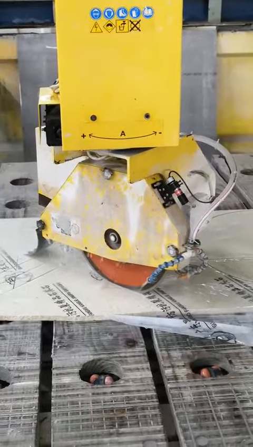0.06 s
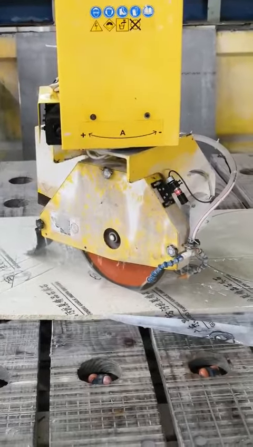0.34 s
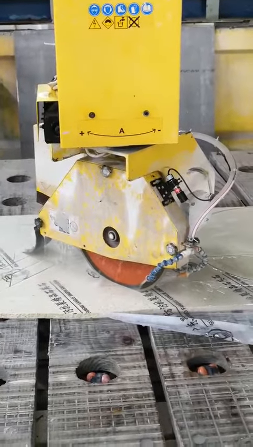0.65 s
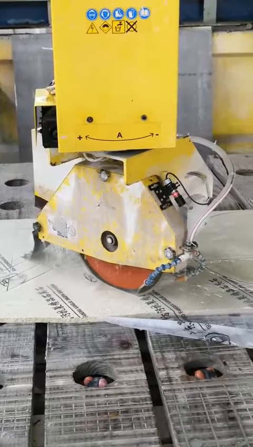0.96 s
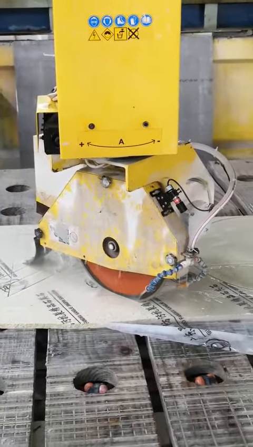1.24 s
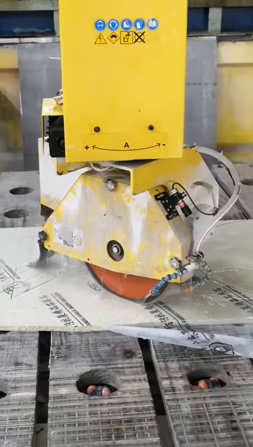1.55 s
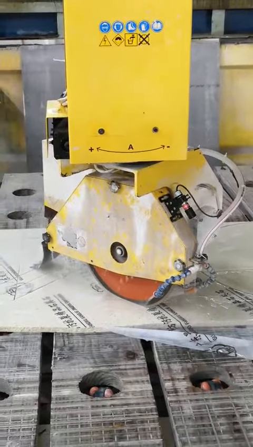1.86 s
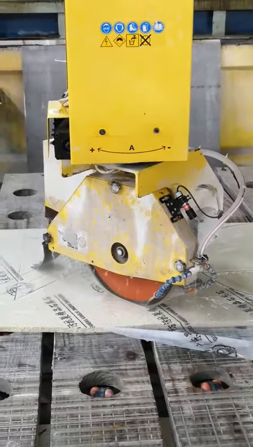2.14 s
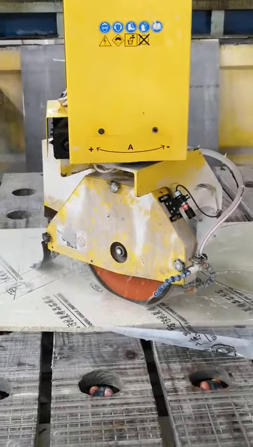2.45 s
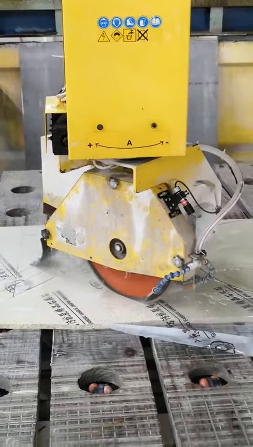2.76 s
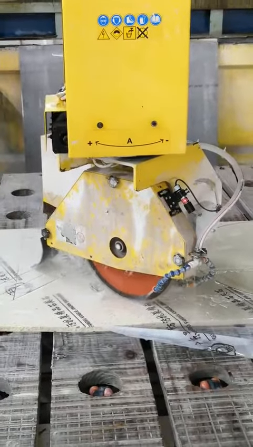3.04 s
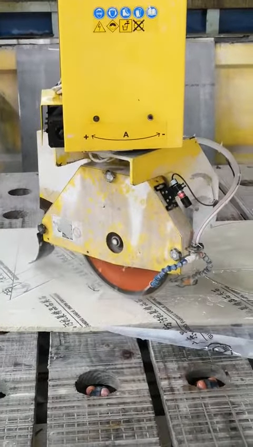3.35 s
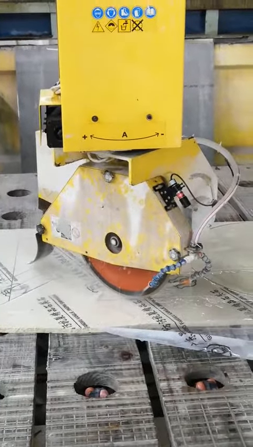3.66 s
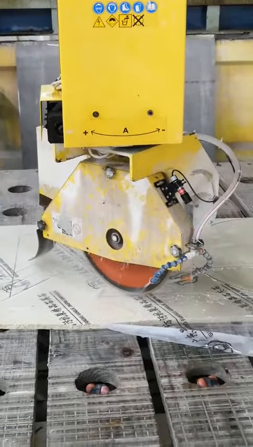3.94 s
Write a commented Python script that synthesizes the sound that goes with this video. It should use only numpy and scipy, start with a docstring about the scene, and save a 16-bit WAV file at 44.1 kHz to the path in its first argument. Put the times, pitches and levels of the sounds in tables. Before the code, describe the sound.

In a workshop, a water-cooled saw cuts stone with a loud, shrill buzz. The grinding stops, the blade rings briefly amid low puffs of air on the microphone, and a hollow rumble continues under hissing spray.

```python
"""A water-cooled circular saw grinds through a stone slab in a workshop. The rim scrapes the same way
on every turn: a harsh buzz that the steel blade's resonances make howl, with grit and spray hissing
on top. From 1.6 s the blade speeds up a little as it leaves the stone; near 2.5 s the slab's edge
groans. From 2.8 s the blade brushes the slot and rings out, amid low puffs of air. At 3.3 s a hollow
rumble starts under the spray."""
import sys
import numpy as np
from scipy import signal
from scipy.fft import rfft, irfft
from scipy.io import wavfile

SR = 44100
rng = np.random.default_rng(int(sys.argv[2]) if len(sys.argv) > 2 else 0)


def store_wav(level_fs):
    """Save 16-bit WAV to argv[1]."""
    pcm = np.round(np.clip(np.atleast_2d(level_fs), -1, 1) * 32767)
    wavfile.write(sys.argv[1], SR, pcm.T.astype(np.int16))


N = 176400
T = np.arange(N) / SR

# blade speed (time [s], rate [turns/s])
BLADE_SPEED = [(1.6, 48.94), (1.72, 49.13), (2.0, 49.35), (2.3, 49.46), (2.4, 49.62)]
# grit torn from the slot (time [s], level [dB])
GRIT_ENVELOPE = [(0, -23.5), (.75, -23.5), (1.3, -28.5), (1.7, -25.5), (1.8, -22.5), (1.95, -26),
                 (2.3, -23.5), (2.55, -20), (2.7, -24), (2.76, -17.5), (2.82, -21), (2.85, -28.5),
                 (3.0, -36.5), (3.3, -40.5), (4, -56)]
# stereo width (frequency [Hz], left-right correlation [-])
CORRELATION = [(120, .92), (200, .85), (400, .45), (700, .25), (1200, .55), (2400, .25), (4000, 0)]
# stereo balance (frequency [Hz], left over right [dB])
BALANCE = [(250, 0), (450, -3.5), (1200, -3), (2000, -5.5), (3250, -3.5), (5400, 1), (8200, 0), (10000, 14),
           (13000, 3)]
CUT_TURNS_PER_S, CUTOFF_HZ = BLADE_SPEED[0][1], 15000


def grinding(turns):
    """The rim buzzes at harmonics of the turning rate; the loudest howl. Three stages crossfade."""
    # deep cut, edge, exit (start [s], end [s], fade-out [s], howl gain [dB], low buzz gain [dB],
    # high buzz gain [dB], unsteadiness [-])
    stages = [(-.5, 1.69, 0.36, 0.2, -1, 0, .15), (1.69, 2.36, 0.17, 0.5, 5, -1.5, 0.12),
              (2.36, 2.82, .08, -0.5, 1, -1, 0.41)]
    # howl in each stage (harmonic [-], level [dB], left over right [dB])
    howl_deep = [(4, -44, 0), (5, -40, 1), (8, -44, -10), (13, -39, -5), (15, -38, -3), (16, -39, -10),
                 (23, -40, -12), (25, -34, 0), (41, -34, 9), (42, -24, -8), (44, -33, 2), (48, -29, -2),
                 (49, -30, 3), (50, -25, -11), (52, -28, -1), (53, -22, -10), (55, -21, -7)]
    howl_edge = [(3, -46, 0), (4, -44, 0), (5, -45, 0), (8, -43, -7), (16, -39, -6), (25, -41, 1),
                 (40, -29, -2), (41, -29, -1), (44, -33, 7), (45, -32, 0), (48, -27, -7), (49, -20, -6),
                 (50, -29, -6), (51, -26, -9), (52, -28, -11), (54, -23, 1), (55, -26, -9)]
    howl_exit = [(3, -47, 0), (25, -43, 0), (41, -33, -3), (44, -34, -3), (45, -32, -4), (47, -31, -4),
                 (48, -29, -4), (49, -30, -10), (50, -26, -14), (52, -30, -9), (53, -29, -13), (54, -22, 7)]
    # lines ringing above the howl, one list per stage (harmonic [-])
    overtone_sets = [
        [76, 77, 78, 81, 82, 90, 98, 99, 100, 102, 112, 118, 120, 125, 129, 150, 156, 202, 214],
        [85, 86, 90, 98, 99, 100, 101, 119, 122, 127],
        [81, 88, 98, 100, 114, 124, 134],
    ]
    # those lines, one value per stage (level [dB])
    overtone_levels = [-34.5, -35.5, -32.5]
    # all other harmonics (frequency [Hz], level per line [dB])
    buzz_spectrum = [(49, -61), (100, -53), (220, -47.5), (300, -63.5), (560, -48), (1100, -49.5),
                     (1550, -54), (2000, -36), (2280, -45), (2650, -34), (2850, -42.5), (3200, -47.5),
                     (3850, -40), (4900, -41), (5400, -44), (6200, -42.5), (7000, -44.5), (7700, -39.5),
                     (8400, -50.5), (9300, -40.5), (10400, -42), (11800, -53.5), (15000, -61.5)]
    split_hz, scatter_db, buzz_wear = 1100, 2.5, .46
    harmonics = np.arange(1, int(CUTOFF_HZ / CUT_TURNS_PER_S))
    howls = (howl_deep, howl_edge, howl_exit)
    out, fade_in_s = 0, stages[0][2]
    for stage, howl_lines, overtones, overtone_db in zip(stages, howls, overtone_sets, overtone_levels):
        start_s, end_s, fade_out_s, howl_db, low_db, high_db, unsteady = stage
        loud, loud_db, pan_db = np.transpose(howl_lines)
        loud = loud.astype(int)
        rest = np.setdiff1d(harmonics, loud)
        hz = rest * CUT_TURNS_PER_S
        treble_db = high_db + scatter_db * rng.standard_normal(len(hz))
        buzz_db = at_hz(buzz_spectrum, hz) + np.where(hz < split_hz, low_db, treble_db)
        buzz_db = np.where(np.isin(rest, overtones), overtone_db, buzz_db)
        buzz = worn_scrape(turns, rest, buzz_db, at_hz(BALANCE, hz), knock=.6, wear=buzz_wear + unsteady)
        howl = worn_scrape(turns, loud, loud_db + howl_db, pan_db, knock=2.2, wear=unsteady)
        rise = np.clip((T - start_s) / fade_in_s + .5, 0, 1)
        fall = np.clip((end_s - T) / fade_out_s + .5, 0, 1)
        out = out + np.sin(rise * fall * np.pi / 2) * (buzz + howl)
        fade_in_s = fade_out_s
    return out


def scrape(turns, harmonics, level_db, pan_db, knock=0, size=8192):
    """A random rim profile repeats every turn; one proud segment strikes with relative strength knock."""
    dispersion_turns = .03  # the disc delays each pitch differently: rms step between harmonics
    delay_turns = np.cumsum(dispersion_turns * rng.standard_normal(size))
    strike = np.exp(-2j * np.pi * np.cumsum(delay_turns))[harmonics]
    profile = knock * strike + rfft(rng.standard_normal(size))[harmonics] / np.sqrt(size)
    # a phase gap between left and right sets the stereo width
    side_walk = np.cumsum(dispersion_turns * rng.standard_normal(size))
    leading_side = np.sign(np.sin(2 * np.pi * side_walk))[harmonics]
    correlation = np.clip(at_hz(CORRELATION, harmonics * CUT_TURNS_PER_S), -1, 1)
    gap_rad = leading_side * np.arccos(correlation)
    gains = pan_gains(pan_db)
    phase_rad = np.angle(profile) + gap_rad * gains[::-1] ** 2 * [[.5], [-.5]]
    lines = np.zeros((2, size // 2 + 1), complex)
    lines[:, harmonics] = from_db(level_db) * gains * np.exp(1j * phase_rad)
    one_turn = irfft(lines) * size / np.sqrt(2)
    angle_turns = np.arange(size + 1) / size
    return np.array([np.interp(turns % 1, angle_turns, np.append(side, side[0])) for side in one_turn])


def worn_scrape(turns, harmonics, level_db, pan_db, knock, wear):
    """The scrape's profile slowly changes as the stone wears away."""
    steady = scrape(turns, harmonics, level_db, pan_db, knock)
    changing = sum(drift(rate_hz=3.9) * scrape(turns, harmonics, level_db, pan_db) for _ in range(2))
    return (steady + wear * changing / np.sqrt(2)) / np.sqrt(1 + wear ** 2)


def groan(turns):
    """The slab groans as the blade breaks through its edge: overlapping swells, one harmonic each."""
    # swells (centre [s], half length [s], harmonic [-], level [dB])
    swells = [(2.46, .13, 14, -33.5), (2.51, .1, 13, -38), (2.53, .15, 16, -31), (2.6, .15, 15, -39),
              (2.71, .11, 12, -43), (2.8, .035, 16, -35)]
    out = 0
    for centre_s, half_s, harmonic, level_db in swells:
        tone = scrape(turns, np.array([harmonic]), level_db, at_hz(BALANCE, [harmonic * CUT_TURNS_PER_S]))
        out = out + np.exp(-((T - centre_s) / half_s) ** 2) * tone
    return out


def grit():
    """Crushed stone hisses in uneven grains."""
    # grit hiss (frequency [Hz], relative density [dB])
    spectrum = [(100, -20), (450, -31), (1550, -26), (2000, -4), (2250, 7), (2650, 6), (3400, -2),
                (3900, 1.5), (6300, 3), (7800, 0), (8400, -4), (9800, 2.5), (11800, -8), (15000, -17)]
    rough_db = 2
    grains = from_db(rough_db * drift(rate_hz=350))
    return envelope(GRIT_ENVELOPE) * unit_rms(grains * hiss(spectrum, pan_scale=.39))


def blade_ring():
    """Brushing the slot, the disc sings one wavering note; its other modes follow the grit and ring on."""
    # note (time [s], level [dB])
    note_level = [(0, -29.5), (2.3, -43), (2.66, -38), (2.8, -31), (2.87, -30.5), (2.93, -37), (3.0, -25.5),
                  (3.06, -28.5), (3.11, -38.5), (3.2, -30), (3.25, -32.5), (3.3, -47), (3.4, -37),
                  (3.55, -56)]
    # steel disc modes (frequency [Hz], half width [Hz], relative level [dB])
    steel_modes = [(1236, 14, -7.5), (2060, 45, 2), (2426, 32, 2.5), (3980, 48, -0.5), (4383, 22, 1),
                   (4873, 51, 0.5), (5630, 32, 0), (6080, 35, 0), (6350, 35, -2.5), (6620, 19, -4)]
    # less damping out of the slot (time [s], gain [dB])
    freed_gain = [(2.35, 0), (2.76, 6.5)]
    note_hz, waver_hz, rough_db = 2674, 9.3, 2
    modes_gain_db, decay_db_per_s = -7, 71
    hz = note_hz + waver_hz * drift(rate_hz=42)
    phase_rad = 2 * np.pi * np.cumsum(hz) / SR + [[0], [np.pi / 3]]
    note = np.sqrt(2) * np.sin(phase_rad) * pan_gains(pan_db=-3)[:, None]
    note_db = in_time(note_level) + rough_db * drift(rate_hz=80)
    decay_db = decay_db_per_s * T
    held_db = np.maximum.accumulate(in_time(GRIT_ENVELOPE) + decay_db) - decay_db  # decaying peak hold
    modes_db = modes_gain_db + in_time(freed_gain) + held_db
    return from_db(note_db) * note + from_db(modes_db) * resonant_noise(steel_modes)


def rumble():
    """A hollow, fluttering rumble with a brighter rush that dies away sooner."""
    # rumble (time [s], level [dB])
    body_level = [(3.32, -59), (3.37, -28.5), (3.45, -24), (3.55, -24), (3.6, -20), (3.65, -25), (3.8, -22),
                  (3.87, -26.5), (3.96, -24.5), (4, -31)]
    # hollow resonances (frequency [Hz], half width [Hz], relative level [dB])
    body_modes = [(202.4, 39, 7), (152, 33, -8.5), (245, 25, -8)]
    # rush (time [s], level [dB])
    rush_level = [(3.32, -50), (3.37, -31.5), (3.45, -27.5), (3.58, -26.5), (3.8, -32.5), (4, -39.5)]
    # rush (frequency [Hz], relative density [dB])
    rush_spectrum = [(150, -25), (300, -10), (370, 2), (445, -0.5), (520, -11), (750, -12.5), (1100, -16.5),
                     (2000, -14.5), (4000, -44)]
    body = envelope(body_level) * resonant_noise(body_modes, pan_scale=.3)
    rush = envelope(rush_level) * hiss(rush_spectrum, pan_scale=.24)
    return body + rush


def spray():
    """Cooling water spatters; the machine adds a thin whine."""
    # water and free-running machine (frequency [Hz], relative density [dB])
    spectrum = [(30, -14), (60, -4.5), (190, -7), (320, -4.5), (520, -14.5), (750, -4), (1200, 0),
                (1550, -7.5), (1850, 4.5), (2150, 0.5), (2550, 2.5), (3000, -2), (4500, -6.5), (7000, -6.5),
                (8400, -10.5), (9700, -8), (11800, -20.5), (15000, -28)]
    water_db, rough_db = -31, .46
    whine_hz, half_width_hz, whine_db = 1778, 9.8, -44.5
    water = from_db(water_db + rough_db * drift(rate_hz=200)) * hiss(spectrum, pan_scale=.83)
    whine = from_db(whine_db) * resonant_noise([(whine_hz, half_width_hz, 0)], pan_scale=.69)
    return water + whine


def buffeting():
    """Low puffs of air on the microphone."""
    # puffs (time [s], level [dB])
    level = [(0, -43), (.72, -39.5), (.84, -56), (1.98, -65), (2.04, -48), (2.58, -58), (2.64, -39),
             (2.84, -32.5), (2.9, -40), (2.99, -28.5), (3.1, -34.5), (3.2, -32.5), (3.28, -39), (3.6, -62),
             (4, -26)]
    # puffs (frequency [Hz], relative density [dB])
    spectrum = [(15, -3), (45, 0.5), (90, 2), (170, -2.5), (300, -11.5), (700, -41)]
    return envelope(level) * hiss(spectrum)


def hiss(spectrum, pan_scale=1):
    """Broadband noise of the given spectrum."""
    return stereo_noise(lambda hz: from_db(at_hz(spectrum, hz)), pan_scale)


def resonant_noise(modes, pan_scale=1):
    """Noise ringing in steep-sided resonances."""
    def gain_at(hz):
        return sum(from_db(db) / (1 + ((hz - mode_hz) / half_hz) ** 2) for mode_hz, half_hz, db in modes)
    return stereo_noise(gain_at, pan_scale)


def stereo_noise(gain_at, pan_scale):
    """Unit-power noise shaped by gain_at(hz); pan_scale scales the stereo balance."""
    hz = np.arange(N // 2 + 1) * SR / N
    correlation = np.clip(at_hz(CORRELATION, hz), -1, 1)
    mid, side = rfft(rng.standard_normal((2, N)))
    left_right = np.sqrt(1 + correlation) * mid + np.sqrt(1 - correlation) * side * [[1], [-1]]
    return unit_rms(irfft(left_right * gain_at(hz) * pan_gains(pan_scale * at_hz(BALANCE, hz)), N))


def drift(rate_hz):
    """Random wander of spread about 1, rolling off above rate_hz."""
    hz = np.arange(N + 1) * SR / (2 * N)
    white = rfft(rng.standard_normal(2 * N))
    return unit_rms(irfft(white / (1 + (hz / rate_hz) ** 2)))[:N]


def pan_gains(pan_db):
    """Left and right gains of constant power."""
    gains = from_db(np.array([pan_db, -pan_db]) / 2)
    return gains / np.sqrt(np.mean(gains ** 2, axis=0))


def envelope(rows):
    """A level curve in dB as gain per sample."""
    return from_db(in_time(rows))


def in_time(rows):
    """A curve at every sample."""
    return np.interp(T, *np.transpose(rows))


def at_hz(rows, hz):
    """A curve read on a log-frequency axis."""
    row_hz, value = np.transpose(rows)
    return np.interp(np.log(np.maximum(hz, 1)), np.log(row_hz), value)


def from_db(db):
    """Decibels to gain."""
    return 10 ** (np.asarray(db) / 20)


def unit_rms(x):
    """Scale to unit power."""
    return x / np.sqrt(np.mean(x ** 2) + 1e-20)


def scene():
    """All sources; grinding and groan are locked to the blade's rotation."""
    turns = np.cumsum(in_time(BLADE_SPEED)) / SR
    return grinding(turns) + groan(turns) + grit() + blade_ring() + spray() + rumble() + buffeting()


def record(dry):
    """Soft limiting of the highest peaks, then a steep low-pass."""
    ceiling = .88
    rounded = dry / (1 + (dry / ceiling) ** 8) ** (1 / 8)
    return signal.sosfilt(signal.ellip(10, .1, 80, CUTOFF_HZ, fs=SR, output="sos"), rounded)


dry = scene()
out = record(dry)
store_wav(out)
```